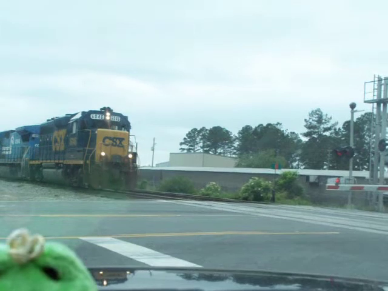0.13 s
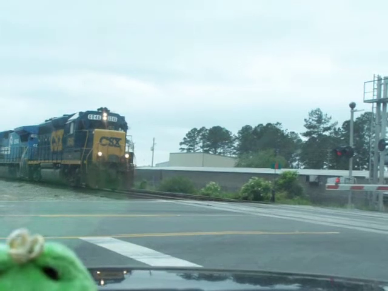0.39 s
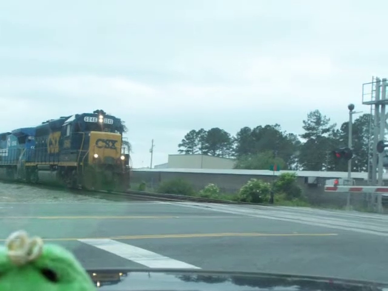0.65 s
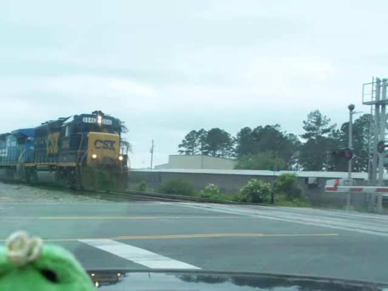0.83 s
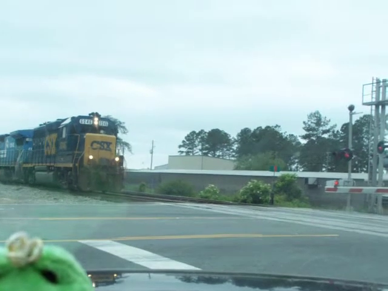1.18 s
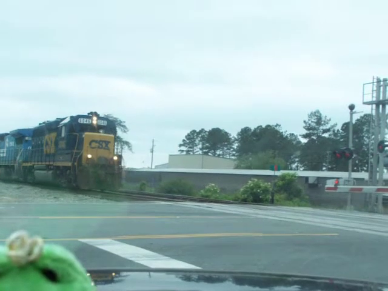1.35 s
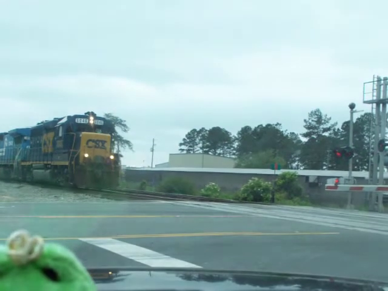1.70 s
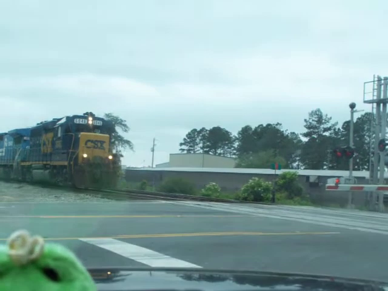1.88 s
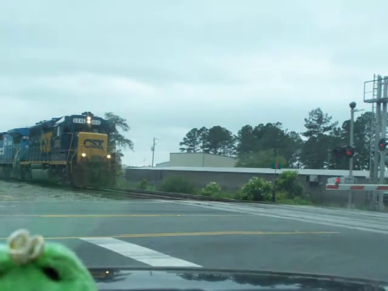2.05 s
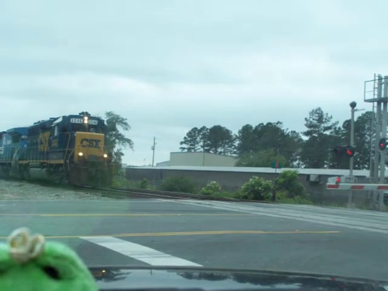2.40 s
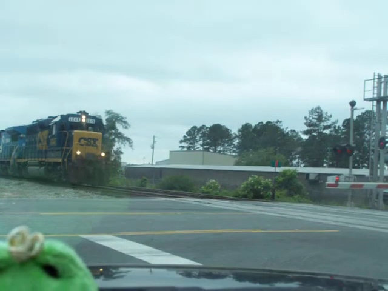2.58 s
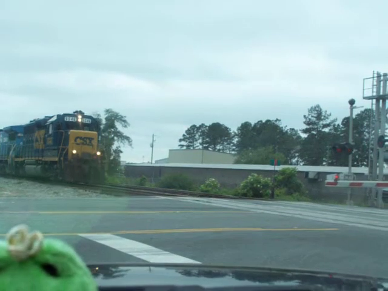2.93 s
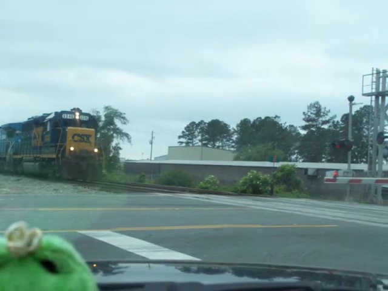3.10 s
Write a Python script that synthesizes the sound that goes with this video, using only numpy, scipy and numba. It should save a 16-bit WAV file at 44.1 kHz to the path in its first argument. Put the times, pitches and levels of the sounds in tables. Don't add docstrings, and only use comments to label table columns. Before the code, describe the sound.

A diesel locomotive revs up nearby, throbbing and whining higher, heard inside an idling car.

```python
import sys
import numpy as np
from scipy import signal
from scipy.fft import rfft, irfft
from scipy.io import wavfile
from scipy.ndimage import uniform_filter1d
from numba import njit

SR = 44100
rng = np.random.default_rng(int(sys.argv[2]) if len(sys.argv) > 2 else 0)


def materialize(psi):
    bounded = np.clip(np.atleast_2d(psi).T, -1, 1)
    quanta = np.round(bounded * 32767).astype(np.int16)
    wavfile.write(sys.argv[1], SR, quanta)


def gain_from_db(level_db):
    decades = np.asarray(level_db, float) / 20
    return 10 ** decades


N = 143325


def set_rms(x, db):
    return x * gain_from_db(db) / np.sqrt(np.mean(x ** 2))


def wander(rate_hz):
    hold = int(SR / rate_hz)
    steps = np.repeat(rng.standard_normal(N // 500), hold)[:N + 2 * hold]
    smooth = uniform_filter1d(uniform_filter1d(steps, hold), hold)
    return 1.3 * smooth[hold:N + hold]


def turbulence(spectrum):
    hz, db = np.array(spectrum, float).T
    octave = np.log2(np.fft.rfftfreq(N, 1 / SR) + 1e-9)
    gain = gain_from_db(np.interp(octave, np.log2(hz), db, -120, -120))
    noise = rfft(rng.standard_normal(N)) * gain
    swell_db = 0.4 * wander(1.5)
    out = 0
    for centre in np.arange(4, 13.5, 1 / 3):
        if np.log2(hz[0]) - 1 < centre < np.log2(hz[-1]) + 1:
            band = irfft(noise * np.clip(1 - 3 * abs(octave - centre), 0, 1), N)
            out = out + band * gain_from_db(swell_db + 1.1 * wander(4.0) + 0.7 * wander(10.0))
    return out


def ring(x, resonances):
    for hz, width, db in resonances:
        x = x + (gain_from_db(db) - 1) * signal.lfilter(*signal.iirpeak(hz, hz / width, SR), x)
    return x


# (time [s], firing rate [Hz], load [dB])
THROTTLE = [
    (0.0, 57.72, -3),
    (0.46, 59.46, -2),
    (0.93, 63.54, -3),
    (1.39, 68.19, -3.5),
    (1.86, 71.59, -2),
    (2.32, 75.18, -1.5),
    (2.79, 77.75, -1.5),
    (3.25, 81.93, -1),
]


def throttle(t):
    s, hz, load_db = np.array(THROTTLE).T
    return np.interp(t, s, hz), np.interp(t, s, load_db)


# (crank order, level at 1.6 s [dB], growth as the exhaust turns toward the car [dB/s])
CRANK_ORDERS = [(6, -39, -1), (7, -43, 0), (8, -30, 0), (9, -37, -1), (10, -45, -2), (11, -47, -4),
                (12, -43, -1), (13, -47, -3), (14, -47, 4), (15, -50, 3), (16, -47, 6), (17, -50, 4),
                (18, -52, 0), (19, -54, -1), (21, -52, -2), (22, -55, -2), (23, -53, -3), (24, -52, -5),
                (26, -54, 1), (73, -63, 8), (78.5, -58, 4)]
# (frequency [Hz], width [Hz], boost [dB])
PIPES = [(82.6, 12, 7.5), (100.4, 16, -4.5), (139.8, 16, 5), (159.5, 24, 3)]


def exhaust(t, hz, load_db):
    start_turns, pipe_spread_turns = 0.62, -0.035
    turns = np.cumsum(hz / 8) / SR + start_turns
    out = 0
    for order, db, growth in CRANK_ORDERS:
        lag = pipe_spread_turns * (order - 8) * (order - 9)
        db = db + growth * (t - 1.6) + load_db + 1.2 * wander(3.0)
        out = out + gain_from_db(db) * np.cos(2 * np.pi * (order * turns + lag))
    knock_db, tilt_db_per_order, scatter_db, waver_db = -59, -0.065, 1.5, 4
    for order in range(27, 72):
        db = knock_db + tilt_db_per_order * order + scatter_db * rng.standard_normal()
        db = db + waver_db * wander(7.0) + load_db
        out = out + gain_from_db(db) * np.cos(2 * np.pi * (order * turns + rng.random()))
    return ring(2 ** 0.5 * out, PIPES)


# (frequency [Hz], density [dB per Hz])
RUMBLE = [(26, -6), (50, -5), (100, -4.5), (190, -11), (400, -16), (800, -22), (900, -23.5), (1250, -25.5)]


def rumble(load_db):
    return set_rms(turbulence(RUMBLE), -32.5) * gain_from_db(0.27 * load_db)


# (frequency [Hz], density [dB per Hz])
HISS = [(740, -40.5), (1250, -10.5), (1400, -2.5), (1750, -5), (2360, -1.5), (3050, -3.5), (3400, -0.5),
        (5140, -12.5), (8000, -34), (10400, -60), (17600, -120)]


def fans(load_db):
    return set_rms(turbulence(HISS), -34.5) * gain_from_db(0.1 * load_db)


# (share of the top blade tone [ratio], width [Hz], level [dB], growth [dB/s])
BLADE_TONES = [(1, 300, -52.5, -3), (2 / 3, 260, -62, 2.5), (1 / 3, 230, -59, 3)]


def blower_whine(t):
    start_hz, rise_hz_per_s, ease_hz_per_s2 = 5848, 900, 22
    top_hz = start_hz + rise_hz_per_s * t - ease_hz_per_s2 * t ** 2
    top_phase = 2 * np.pi * np.cumsum(top_hz) / SR
    out = 0
    for share, width, db, growth in BLADE_TONES:
        lowpass = signal.butter(2, width / 2, fs=SR)
        blur = signal.lfilter(*lowpass, rng.standard_normal((2, N)))
        tone = np.real((blur[0] + 1j * blur[1]) * np.exp(1j * share * top_phase))
        out = out + set_rms(tone, db) * gain_from_db(growth * t)
    return out


# (frequency [Hz], width [Hz], boost [dB])
CABIN = [(79.84, 16, 3.5), (120.5, 16, -5.5), (174.9, 22, 5.5), (252.7, 24, 6), (324.9, 16, -4),
         (508.6, 36, 7.5), (593, 36, -4), (744.6, 45, 7), (1071, 50, -3.5), (1243, 90, -3), (2441, 80, 3),
         (2846, 150, 3), (3395, 350, 4), (4000, 150, 2.5)]


def cabin(outside):
    return ring(outside, CABIN)


# (harmonic [number], level [dB])
IDLE_HARMONICS = [(1, -26), (2, -40.5), (3, -47), (4, -50)]


def car_idle(t):
    idle_hz, sag_hz_per_s, drift, wobble_db = 23.26, 0.18, 0.0033, -0.68
    hz = (idle_hz - sag_hz_per_s * t) * (1 + drift * wander(1.5))
    phase = 2 * np.pi * np.cumsum(hz) / SR
    out = 0
    for k, db in IDLE_HARMONICS:
        out = out + gain_from_db(db + k * wobble_db * wander(2.7)) * np.sin(round(k) * phase)
    return 2 ** 0.5 * out


def scene():
    t = np.arange(N) / SR
    hz, load_db = throttle(t)
    outside = exhaust(t, hz, load_db) + rumble(load_db) + fans(load_db) + blower_whine(t)
    return (cabin(outside) + car_idle(t))[None]


@njit
def delta_steps(x, down, up, levels):
    y, last, step = np.empty(len(x)), 0.0, 0.01
    for i in range(len(x)):
        q = min(max(np.floor((x[i] - last) / step * levels), -2 * levels), 2 * levels - 1) + 0.5
        last += q * step / levels
        y[i] = last
        step = max(step * (down if abs(q) < levels else up ** (abs(q) - levels + 0.5)), 1e-5)
    return y


def band_limit(x):
    return signal.sosfilt(signal.butter(12, 8870, fs=SR, output="sos"), x)


# (frequency [Hz], gain [dB])
PLAYBACK_EDGE = [(7000, -3.5), (7600, -3.5), (8000, -10), (8400, -16), (8800, -28), (9200, -47)]


def record(dry):
    camera_sr = 16000
    sampled = signal.resample(dry[0], N * camera_sr // SR)
    stepped = delta_steps(sampled, 0.91, 1.25, 4.7)
    mirrored = np.fft.fft(stepped) * SR / camera_sr
    hz, db = np.array(PLAYBACK_EDGE, float).T
    mirrored = mirrored * gain_from_db(np.interp(np.arange(len(stepped)) * SR / N, hz, db, 0, -150))
    mix = irfft(mirrored, N)[None]
    return band_limit(mix)


dry = scene()
out = record(dry)
materialize(out)
```